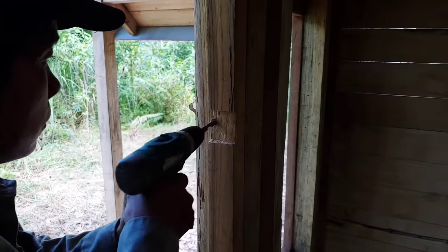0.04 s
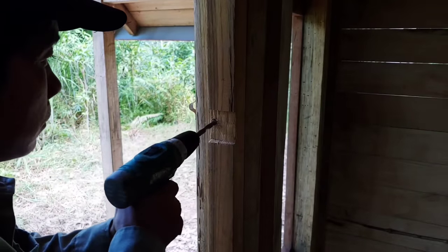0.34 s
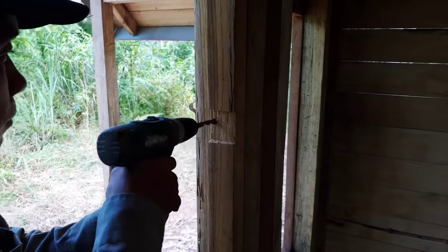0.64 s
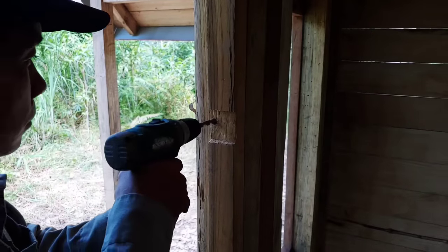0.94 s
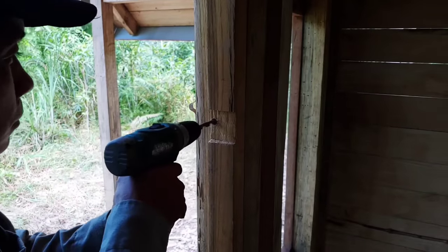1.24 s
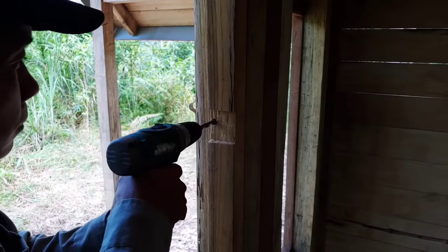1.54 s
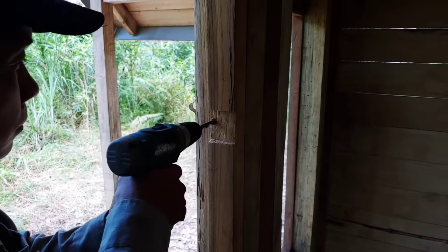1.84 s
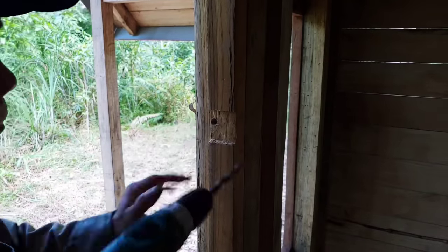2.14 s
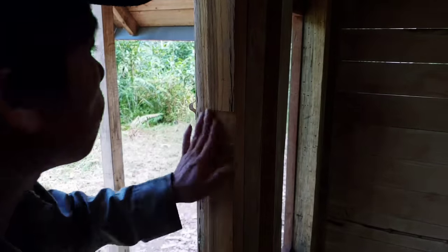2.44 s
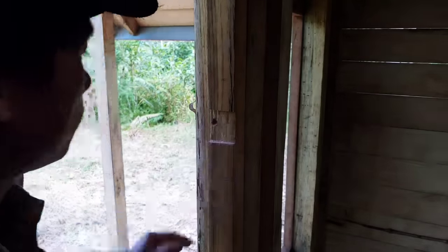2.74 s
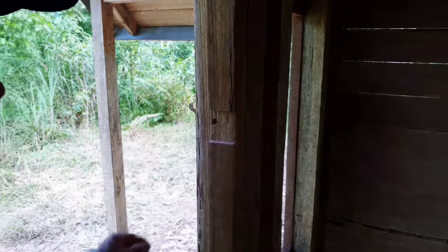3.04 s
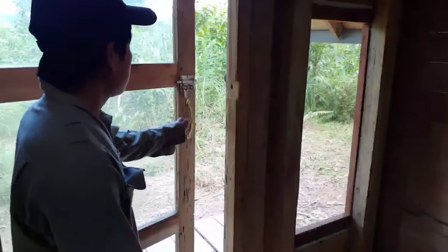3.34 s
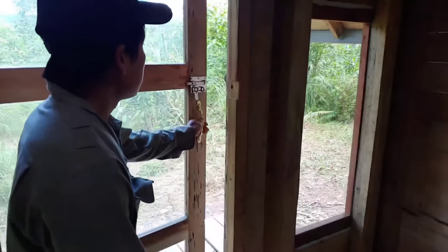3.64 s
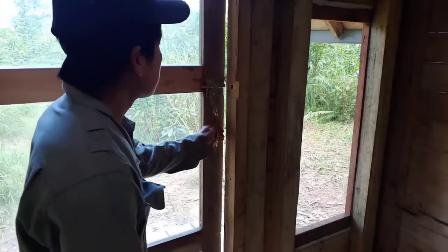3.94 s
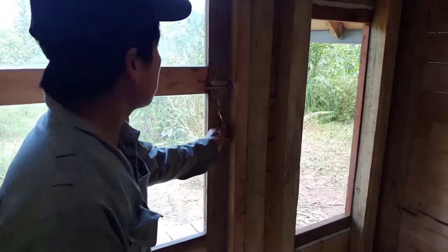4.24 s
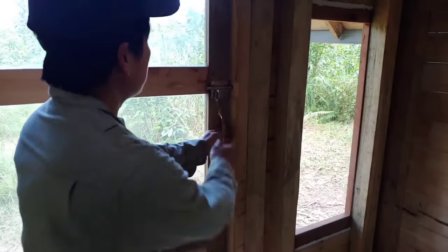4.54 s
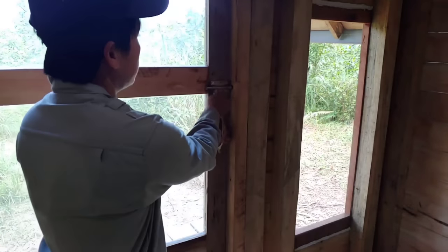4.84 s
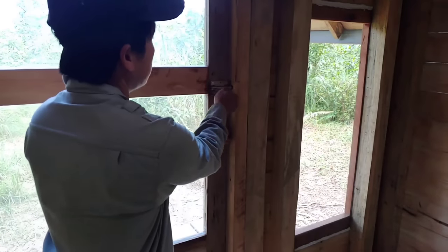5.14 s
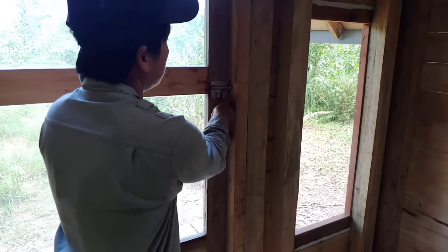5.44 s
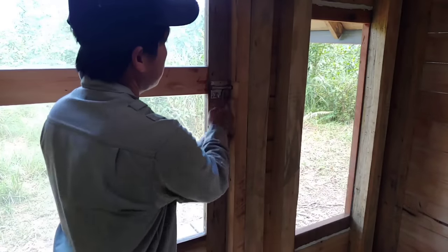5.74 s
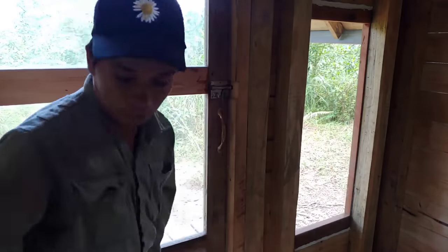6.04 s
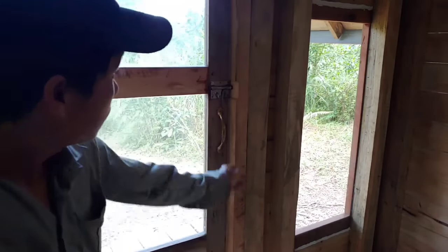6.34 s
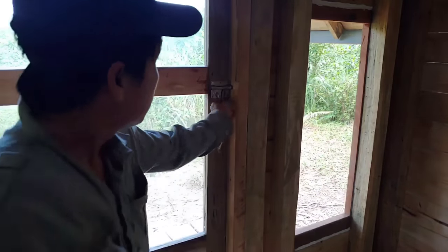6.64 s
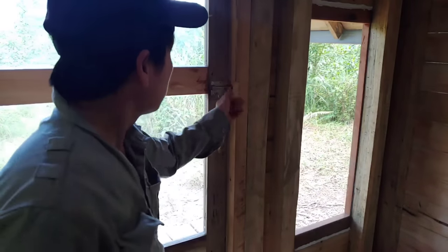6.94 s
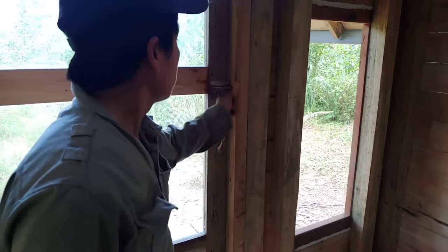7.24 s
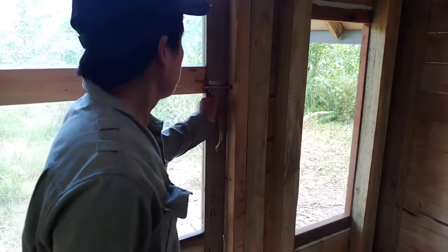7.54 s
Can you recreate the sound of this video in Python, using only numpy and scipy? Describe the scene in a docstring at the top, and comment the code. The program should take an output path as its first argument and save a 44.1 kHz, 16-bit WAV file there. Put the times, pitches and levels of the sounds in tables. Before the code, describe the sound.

A cordless drill drives a screw into a wooden post in three quick bursts, its gears rattling and whining while the wood hums and the bit slips with small thumps. The stopped tool scuffs the post. After a short pause a wooden door shuts with a loud boom, and its steel bolt scrapes and clicks home, followed by lighter knocks. The small cabin echoes briefly, and nearly everything is heard on the left.

```python
"""A cordless drill drives a screw into a door post in three bursts, in a small plank cabin.
Its gears rattle and whine, the post's hum surges and the bit slips; then the stopped tool scuffs the post.
The wooden door is pulled shut with a boom, its steel bolt scrapes and clicks home, and the latch is tried.
Faint background hiss and rumble swell briefly now and then. Nearly everything is heard on the left."""
import sys
import numpy as np
from scipy import signal
from scipy.fft import rfft, irfft
from scipy.io import wavfile
from scipy.ndimage import uniform_filter1d

SR = 44100
rng = np.random.default_rng(int(sys.argv[2]) if len(sys.argv) > 2 else 0)


def wrap_up_sound(samples):
    """Save the sound to the file named by the first command line argument, as 16-bit audio."""
    columns = np.atleast_2d(samples).T
    # keep every value between -1 and 1, then stretch to whole-number steps
    tamed = np.clip(columns, -1, 1)
    steps = np.round(tamed * 32767).astype(np.int16)
    wavfile.write(sys.argv[1], SR, steps)


N = 334278
TIME = np.arange(N) / SR

# trigger pulls: (press [s], ease off [s], let go [s], spin-up [s], top speed [Hz], load [0-1], level [dB])
PULLS = [(-.035, 1.295, 1.378, .232, 328.5, 1, -.6), (1.485, 1.893, 2.0, .145, 313, .5, 0),
         (2.035, 2.655, 2.78, .175, 302.3, 0, 1)]
# the post's hum surges, with a thump that is loud where the bit slips:
# (time [s], thump [dB], surge length [s], surge [dB])
SURGES = [(0.15, -50, 0.058, -35), (0.288, -41, 0.085, -30.5), (0.514, -33.5, 0.026, -29),
          (.819, -35, 0.094, -37.5), (1.057, -36, .025, -31.5), (1.268, -58, .06, -37.5),
          (1.632, -53, 0.049, -30.5), (1.96, -58, 0.064, -32), (2.184, -55, .06, -32),
          (2.375, -44, 0.031, -36), (2.511, -41.5, 0.028, -29), (2.649, -55.5, 0.021, -41)]
# tone of the rattling gearbox: (frequency [Hz], level [dB])
GEARBOX_TONE = [(300, -14.5), (600, -6.5), (1200, -0.5), (2200, -1), (3300, -0.5), (4900, -6.5),
                (7000, -5.5), (10000, -7.5), (12500, -5.5), (13600, -12.5), (15500, -21)]
# tone of the wooden post: (frequency [Hz], level [dB])
POST_TONE = [(40, -40), (60, -16.5), (85, -11), (120, 2.5), (165, 7.5), (195, -2), (260, 4), (370, 0),
             (450, -3.5), (600, 1.5), (850, -1), (1300, -8.5), (2500, -16), (6000, -32.5)]
# the background swells briefly: (start [s], length [s], hiss [dB], rumble [dB])
BACKGROUND_SWELLS = [(2.822, 0.62, -74, -72.5), (4.175, 0.25, -75.5, -69), (5.297, 0.496, -76, -77.5),
                     (7.356, 0.18, -90, -81)]
# tone of the faint hiss: (frequency [Hz], level [dB])
HISS_TONE = [(100, -17), (300, 9.5), (900, 3), (2000, -5.5), (5000, -16), (7800, -21.5), (8600, -9),
             (9500, -18.5), (12500, -24), (15000, -29.5)]


def amp(db):
    """Turn decibels into a gain."""
    return 10 ** (np.asarray(db) / 20)


def unit(x):
    """Scale a sound to an average (rms) level of 1."""
    return x / np.sqrt(np.mean(x ** 2))


def struck(x):
    """Scale a hit so that its first 20 ms have an average (rms) level of 1."""
    return x / np.sqrt(np.mean(x[:SR // 50] ** 2))


def at(points, hz):
    """Read between (frequency [Hz], value) points, with octaves evenly spaced."""
    freqs, values = np.transpose(points)
    return np.interp(np.log(np.maximum(hz, 1)), np.log(freqs), values)


def colour(x, tone, size=4096):
    """Filter a sound to a tone given as (frequency [Hz], level [dB]) points."""
    cepstrum = irfft(np.log(amp(at(tone, np.linspace(0, SR / 2, size // 2 + 1)))))
    # fold the filter so that it rings only after a hit, never before
    cepstrum[1:size // 2] *= 2
    cepstrum[size // 2 + 1:] = 0
    return signal.fftconvolve(x, irfft(np.exp(rfft(cepstrum))))[:len(x)]


def resonate(x, modes):
    """Let a sound ring at the given notes: (pitch [Hz], width [Hz], level [dB])."""
    return sum(amp(db) * signal.lfilter(*signal.iirpeak(hz, hz / width, fs=SR), x)
               for hz, width, db in modes)


def fade(t60):
    """A one-second curve that falls by 60 dB every t60 seconds."""
    return np.exp(-np.log(1000) * TIME[:SR] / max(t60, 1 / SR))


def burst(t60):
    """Noise that dies away."""
    return rng.standard_normal(SR) * fade(t60)


def ring(modes, damping=1):
    """Fading notes (pitch [Hz], level [dB], fade time [s]); more damping shortens them."""
    return sum(rng.choice([-1, 1]) * amp(db) * fade(t60 / damping) * np.sin(2 * np.pi * hz * TIME[:SR])
               for hz, db, t60 in modes)


def walk(rate):
    """A smooth random wobble, about 1 in size, that turns about rate times a second."""
    step = max(int(SR / rate), 1)
    stairs = np.repeat(rng.standard_normal(N // step + 1), step)[:N]
    return unit(uniform_filter1d(stairs, step))


def swell(start, length, attack_s, release_s):
    """A curve that rises from 0 towards 1, holds, then dies away."""
    rise = np.clip((TIME - start) / max(attack_s, 1 / SR), 0, 1)
    return rise * np.exp(-np.clip((TIME - start - length) / max(release_s, 1 / SR), 0, 50))


def add(track, s, sound):
    """Mix a sound into a track, s seconds in."""
    i = max(int(s * SR), 0)
    track[i:i + len(sound)] += sound[:N - i]


def friction(strokes, catches_per_s, spread_db, edge_s):
    """Sliding surfaces catch and let go in many tiny, uneven ticks."""
    grip = sum(amp(db) * np.clip(np.minimum(TIME - s, s + length - TIME) / edge_s + .5, 0, 1)
               for s, length, db in strokes)
    catches = (rng.random(N) < catches_per_s / SR) * rng.standard_normal(N) * amp(spread_db * walk(90))
    return grip * unit(catches)


def motor():
    """The motor runs up at each pull, coasts as the finger eases, and is braked; faster is louder."""
    start_hz, coast_s, db_per_octave = 135, .28, 8
    state = np.zeros((5, N))
    for press, ease, let_go, spin_up, top_hz, load, db in PULLS:
        run_up = 1 - (1 - np.clip((TIME - press) / spin_up, 0, 1)) ** 2
        slow_down = np.exp(-np.clip(TIME - ease, 0, 1) / coast_s)
        speed = (start_hz + (top_hz - start_hz) * run_up) * slow_down
        switched_on = swell(press, let_go - press, attack_s=.06, release_s=.018)
        running = switched_on * amp(db_per_octave * np.log2(speed / top_hz))
        coasting = swell(ease, let_go - ease, .02, .02)
        for track, value in zip(state, (speed, load, db, running, coasting)):
            np.copyto(track, value, where=TIME >= press)
    return state


def gear_rattle(angle, carrier_angle):
    """Teeth clash six times a turn, harder on one side of the carrier that holds the small gears."""
    # notes of the drill's casing: (pitch [Hz], width [Hz], level [dB])
    casing = [(3100, 450, -1), (4350, 260, -7), (8500, 500, -5), (12250, 850, 4)]
    clashes = (1 + .6 * np.cos(6 * angle)) * (1 + .2 * np.cos(carrier_angle))
    # the same tooth flaws come round with every turn
    profile = rng.standard_normal(120)
    flaws = unit(np.interp(angle / (2 * np.pi), np.arange(120) / 120, profile - profile.mean(), period=1))
    flaws = colour(flaws, [(1200, -19), (2400, -3.5), (14000, 3.5)])
    loose = rng.standard_normal(N) * clashes * amp(0.5 * walk(300))
    teeth = colour(loose + amp(-8.5) * flaws, GEARBOX_TONE)
    return amp(-0.25) * unit(teeth + resonate(teeth, casing))


def gear_whine(angle, speed, load, coasting):
    """Motor and gear teeth sing flickering notes that follow the shaft's speed, softer when slow."""
    # whining notes: (rough multiple of the shaft speed, running light [dB], under load [dB])
    notes = [(2, -16.5, -22.5), (4, -13, -19.5), (6.05, -23, -19.5), (6.79, -19.5, -23.5), (8, -15, -26.5),
             (8.67, -21.5, -32), (14.33, -22, -29.5), (23.9, -21, -19), (30, -28, -23.5),
             (38.5, -18, -28.5), (48, -23, -24.5)]
    # the housing boosts a note that sweeps past its own: (pitch [Hz], width [Hz], boost [dB])
    housing = [(1560, 445, 13), (6000, 1500, 4), (7600, 1000, 3)]
    flicker_db, coast_db = 2.5, 5
    whine = np.zeros(N)
    for multiple, light_db, loaded_db in notes:
        boost_db = sum(db * np.exp(-(2 * (multiple * speed - hz) / width) ** 2)
                       for hz, width, db in housing)
        multiple = round(3 * multiple) / 3  # the gearing sets notes on thirds of the shaft speed
        boost_db += coast_db * coasting * (multiple > 20)  # coasting teeth whine more
        level_db = light_db + load * (loaded_db - light_db) + boost_db + flicker_db * walk(35)
        whine += amp(level_db) * unit(np.sin(multiple * angle))
    return whine * (speed / 300) ** .7


def post_hum(angle):
    """The post hums at its own note, pushed by the unbalanced motor and the chattering screw."""
    push = np.sin(angle + 0.41 * walk(60)) + amp(19.5) * rng.standard_normal(N)
    hum = resonate(push, [(291.0, 34.3, 0)])
    hum = resonate(hum, [(282.3, 20, -2.5), (246.9, 8.3, -3.0)])
    return hum / np.sqrt(uniform_filter1d(hum ** 2, SR // 25))  # even out the level


def hum_strength():
    """How loud the post hums: a wavering base, brief surges, and kicks as the motor starts and slows."""
    kick_s, start_db, slow_db = 0.039, -35.5, -41.5
    shakes = [(s, length, db) for s, _, length, db in SURGES]
    for press, ease, *_ in PULLS:
        shakes += [(press + .04, kick_s, start_db), (ease, kick_s, slow_db)]
    power = sum((amp(db) * swell(s, length, 0.014, .018)) ** 2 for s, length, db in shakes)
    base = amp(-43.5 + 2 * walk(22))
    return np.sqrt(base ** 2 + power)


def screw_bites():
    """Each bite of the screw drags the motor down and strengthens the throb and the grinding."""
    # bites into the wood: (start [s], length [s], speed lost [Hz], throb [dB], grinding [dB])
    bites = [(.15, 0.097, 23.5, -46.5, -46.5), (.24, .14, 38, -38.5, -42.5), (0.521, 0.069, 52, -39.5, -42),
             (.775, 0.13, 48.2, -39, -44), (1.03, .105, 44, -40.5, -45), (1.575, .2, 1, -45.5, -45.5),
             (2.5, 0.055, 0.99, -45.5, -45.5), (2.651, 0.086, 2, -41.5, -47)]
    starts, lengths, lost_hz, throb_db, grind_db = np.transpose(bites)
    grips = np.array([swell(s, length, .05, .048) for s, length in zip(starts, lengths)])
    speed_lost = np.max(lost_hz[:, None] * grips, axis=0)
    throb_gain = amp(-51) + amp(throb_db) @ grips
    grind_gain = np.hypot(amp(-46), amp(grind_db) @ grips)
    return speed_lost, grips.max(axis=0), throb_gain, grind_gain


def drill():
    """The motor turns the gears and the screw shakes the post; returns noises and tones separately."""
    free_speed, load, strength_db, running, coasting = motor()
    speed_lost, grip, throb_gain, grind_gain = screw_bites()
    gear_db = strength_db - 36.5
    speed = free_speed - speed_lost
    unevenness = (.0005 + .0015 * load) * walk(70) + .002 * walk(6)
    angle = 2 * np.pi * np.cumsum(speed * (1 + unevenness)) / SR
    carrier_angle = .26 * angle
    rattle = gear_rattle(angle, carrier_angle)
    grind = unit(colour(rng.standard_normal(N) * (1 + .5 * np.cos(carrier_angle)), POST_TONE))
    whine = gear_whine(angle, speed, load, coasting)
    hum = post_hum(angle)
    # the slow gear carrier rocks the wall near its lowest note
    rocking = amp(2 * walk(12)) * unit(np.sin(carrier_angle + 0.82 * walk(30)))
    throb = resonate(rocking, [(81.2, 17, 0.0058)])
    noises = amp(gear_db + 0.5 * grip) * rattle + amp(1.5) * grind_gain * grind
    tones = amp(gear_db - 1.0) * whine + hum_strength() * hum + throb_gain * throb
    return running * noises, running * tones


def rumble():
    """Low rumble of air that swells briefly now and then."""
    # tone of the rumble: (frequency [Hz], level [dB])
    tone = [(25, -31.5), (55, -13), (80, 11), (135, 4), (190, -1), (300, -30), (800, -59.5)]
    swells = sum(amp(db) * swell(s, length, 0.072, 0.021) for s, length, _, db in BACKGROUND_SWELLS)
    return (amp(-74) + swells) * amp(1.2 * walk(7.6)) * unit(colour(rng.standard_normal(N), tone))


def background():
    """Faint hiss and rumble that swell briefly, and one deep puff of air."""
    deep_tone = [(25, -18), (55, -8), (80, 0), (135, -6.5), (200, -25), (600, -71)]
    deep = unit(colour(rng.standard_normal(N), deep_tone))
    puff = amp(-49) * swell(start=3.62, length=0.076, attack_s=0.018, release_s=.05) * deep
    low_air = rumble() + puff
    swells = sum(amp(db) * swell(s, length, 0.087, .03) for s, length, db, _ in BACKGROUND_SWELLS)
    hiss = amp(1.2 * walk(36)) * unit(colour(rng.standard_normal(N), HISS_TONE))
    return low_air + (amp(-81) + swells) * hiss


def thumps_and_brake():
    """Each surge opens with a thump and a tick, loud where the bit slips; the brake clacks after a run."""
    out = np.zeros(N)
    for s, db, _, _ in SURGES:
        thump = struck(colour(burst(0.16), POST_TONE))
        tick = struck(colour(burst(0.15), GEARBOX_TONE))
        add(out, s, amp(db) * (thump + amp(-4.5) * tick))
    for _, _, let_go, *_ in PULLS:
        clack = struck(colour(burst(.12), GEARBOX_TONE))
        add(out, let_go - .005, amp(-43.5) * clack)
    return out


def tool_scuffs():
    """The stopped tool scuffs the post, which answers with a low note."""
    # shifts of the tool: (start [s], length [s], level [dB])
    strokes = [(3.025, 0.063, -57.5), (3.16, 0.088, -53), (3.293, 0.035, -50), (3.34, 0.19, -74)]
    scuff = friction(strokes, catches_per_s=2400, spread_db=2.0, edge_s=0.024)
    return amp(-3) * colour(scuff, GEARBOX_TONE) + resonate(scuff, [(271, 48, 24)])


def door():
    """Each blow rattles the boards, rings the frame and sets the whole door booming."""
    # blows: (time [s], level [dB], hardness [dB per octave], rattle fade time [s], boom [dB])
    knocks = [(4.546, -63.5, 3.5, 0.14, -24), (4.598, -52.5, -2, 0.078, -30), (4.704, -29, 0, 0.4, -8),
              (4.753, -59, -9, 0.13, 18.5), (4.914, -16.5, 1.3, 0.62, -9), (4.991, -23.5, 2, 0.35, -13),
              (5.056, -27, 1, 0.16, -10.5), (5.1, -34, 0, 0.11, -1.5), (5.258, -57.5, 5, 0.17, -7.5),
              (6.043, -37.5, 1.5, 0.22, -15), (6.343, -42, 4.5, 0.15, -11), (6.712, -61, 1.5, 0.19, -17.5),
              (6.899, -47, -0.5, 0.2, -28), (7.187, -54.5, -0.5, 0.19, -17.5),
              (7.295, -60.5, 1, 0.12, -20.5), (7.403, -52, 0, 0.24, -20), (7.489, -40, 1, 0.14, -28)]
    # tone of the boards: (frequency [Hz], level [dB])
    board_tone = [(29, -57), (56, -8), (214, -6.5), (253, 3.5), (483, -9.5), (598, -1.5), (707, -13.5),
                  (1110, -16.5), (1350, -20.5), (1750, -20.5), (5510, -43), (12400, -53), (15000, -74)]
    # notes of the frame: (pitch [Hz], level [dB], fade time before each blow scales it [s])
    frame_notes = [(156.5, -2, 0.75), (189, -10.5, .6), (254.7, 2, 0.57), (298.7, -0.5, 0.64),
                   (371, 4.5, 0.44), (420, -2.5, 0.22), (441.5, 6.5, .45), (494, -10, 0.35),
                   (612, -3, 0.55), (779, -4.5, 0.33), (870, -12.5, 0.33), (1085, -6.5, 0.29),
                   (1400, -19.5, 0.28), (1730, -26.5, .3)]
    # deep notes of the whole door: (pitch [Hz], level [dB], fade time [s])
    boom_notes = [(47.6, -15, 0.81), (58.6, -2.5, 0.93), (67.54, -2, 0.6), (78.4, -0.5, 0.56),
                  (93, 3.5, .55), (121.5, -2.5, 0.33)]
    out = np.zeros(N)
    for s, db, hardness, t60, boom_db in knocks:
        tone = [(hz, level + hardness * np.log2(hz / 400)) for hz, level in board_tone]
        notes = [(hz, level + hardness * np.log2(hz / 400), decay) for hz, level, decay in frame_notes]
        # wood soaks up the middle and treble sooner than the bass
        bass = colour(burst(t60), [(500, 0), (1000, -30)])
        treble = colour(burst(.72 * t60), [(350, -30), (750, 2)])
        boards = struck(colour(bass + treble, tone))
        frame = struck(ring(notes, damping=0.68 / t60))
        boom = struck(ring(boom_notes)) * (1 - fade(0.29))  # the heavy door takes a moment to get going
        add(out, s, amp(db) * (amp(-5.5) * boards + amp(-3.5) * frame + amp(boom_db) * boom))
    return out


def bolt():
    """The steel bolt scrapes through its guides and clicks against its stops."""
    # slides of the bolt: (start [s], length [s], level [dB])
    slides = [(4.72, 0.36, -55), (5.44, 0.0076, -33.5), (5.48, 0.092, -38), (5.602, 0.033, -37.5),
              (5.728, 0.056, -37), (6.035, 0.082, -49.5), (7.45, 0.036, -43)]
    # steel hits steel: (time [s], level [dB], ring pitch [Hz], ring level against the click [dB])
    clicks = [(4.707, -63.5, 630, 20.5), (4.915, -25.5, 6700, -15), (4.998, -45, 8200, -5.5),
              (5.429, -44, 2610, -11), (5.473, -37.5, 8100, -12.5), (5.506, -43, 1180, -4),
              (5.596, -41.5, 11980, -9), (6.045, -47.5, 6200, -10.5), (6.335, -64, 9380, -6),
              (6.342, -50.5, 8630, 6), (6.343, -52, 7000, 6.5), (6.344, -51, 824, 3.5),
              (6.714, -74.5, 739, 5.5), (6.898, -63.5, 1250, 6), (6.9, -68.5, 2200, 1),
              (6.972, -55.5, 11940, -21.5), (7.404, -84, 2660, 17), (7.451, -47.5, 12300, -13)]
    # tone of the scrapes and clicks: (frequency [Hz], level [dB])
    tone = [(150, -11.5), (250, 2), (420, 2), (465, -9.5), (593, -1), (882, -8), (1180, -4), (1290, -7.5),
            (2240, -6), (7900, -20.5), (9880, -24.5), (12400, -13), (15500, -90.5)]
    # notes of the bolt and its plate: (pitch [Hz], width [Hz], level [dB])
    notes = [(606, 30, 2.5), (820, 38, 2), (1186, 40, 5.5), (1380, 54, -2), (1420, 33, 1.5),
             (1675, 18, 4.5), (2000, 17, 1.5), (2160, 25, 2.5), (2880, 38, 3), (3760, 26, 1.5),
             (4820, 32, 0), (5840, 39, 6.5), (6950, 70, 4), (7800, 65, 8)]
    contact = amp(1.35) * friction(slides, catches_per_s=7200, spread_db=2.0, edge_s=0.035)
    rings = np.zeros(N)
    for s, db, ring_hz, ring_db in clicks:
        tick = amp(db + 2) * struck(burst(.01) + amp(-8) * burst(.13))
        add(contact, s, tick)
        ping = struck(resonate(tick, [(ring_hz, ring_hz / 16, 0)]))
        add(rings, s, amp(db + ring_db) * ping)
    steel = amp(7) * colour(contact, tone)
    return amp(-0.5) * steel + resonate(steel, notes) + rings


def cabin_echo():
    """Echo of the plank walls, left and right: alike in the bass, unrelated in the treble."""
    # how long the cabin rings: (frequency [Hz], fade time [s])
    fade_times = [(60, 0.64), (300, 0.26), (1200, 0.18), (4000, 0.19), (9000, 0.15), (15000, .2)]
    hz = np.linspace(0, SR / 2, SR // 2 + 1)
    left, other = rfft(rng.standard_normal((2, SR)))
    alike = 1 / (1 + (hz / 1400) ** 2)
    sides = np.array([left, alike * left + np.sqrt(1 - alike ** 2) * other])
    echo = np.zeros((2, SR))
    for centre, t60 in fade_times:
        band = at([(f, float(f == centre)) for f, _ in fade_times], hz)
        echo += irfft(sides * band) * fade(t60)
    echo *= 1 - fade(0.058)  # the echo builds up briefly
    return echo / np.sqrt(np.sum(echo[0] ** 2))


def place(x, echo, wet_db):
    """Blend a sound with its echo at about the same power; the right side gets more of the echo."""
    wet = amp(wet_db + np.array([[0], [14]]))
    walls = signal.fftconvolve(x[None], echo, axes=1)[:, :N]
    return (x + wet * walls) / np.sqrt(1 + wet ** 2)


def scene():
    """Drill, door and bolt all sound in the same small cabin."""
    echo = cabin_echo()
    noises, tones = drill()
    noises = noises + thumps_and_brake() + tool_scuffs()
    tool = place(noises, echo, wet_db=-7.5) + place(tones, echo, wet_db=-15.0)
    return tool + place(door(), echo, wet_db=-1.0) + place(bolt(), echo, wet_db=-8.0) + background()


def record(dry):
    """A strong left and a weak, late, faintly noisy right; the level dips once and the top treble is cut."""
    # how much weaker the right side is: (frequency [Hz], level [dB])
    right_tone = [(60, -28), (280, -27.5), (1200, -25), (4000, -23.5), (13000, -23)]
    lag_samples, top_hz = 3, 15400
    dip_start_s, dip_end_s, dip_db = 3.805, 3.89, -35
    right_noise = amp(2.5) * rumble() + amp(-79) * unit(colour(rng.standard_normal(N), HISS_TONE))
    left, right = dry * amp(5.5)
    right = colour(np.pad(right, (lag_samples, 0))[:N], right_tone) + right_noise
    dip = uniform_filter1d(1. * ((TIME > dip_start_s) & (TIME < dip_end_s)), SR // 100)
    heard = np.array([left, right]) * amp(dip_db * dip)
    return signal.sosfilt(signal.ellip(10, .2, 70, top_hz, fs=SR, output="sos"), heard)


dry = scene()
out = record(dry)
wrap_up_sound(out)
```